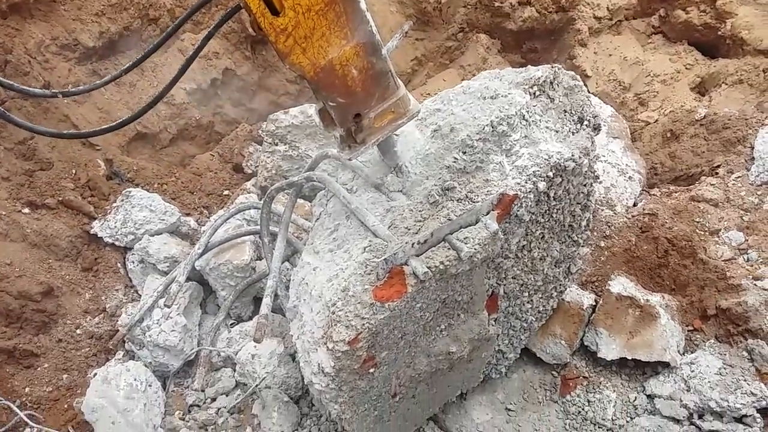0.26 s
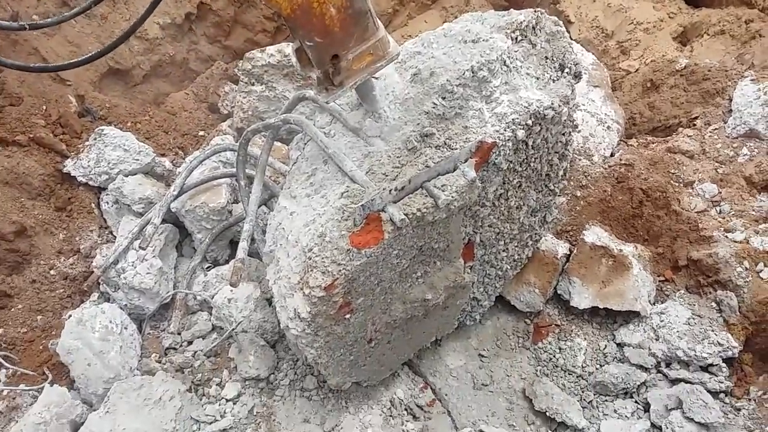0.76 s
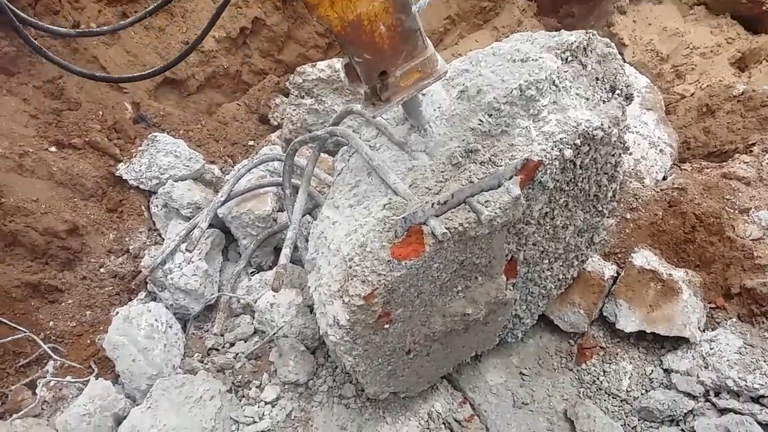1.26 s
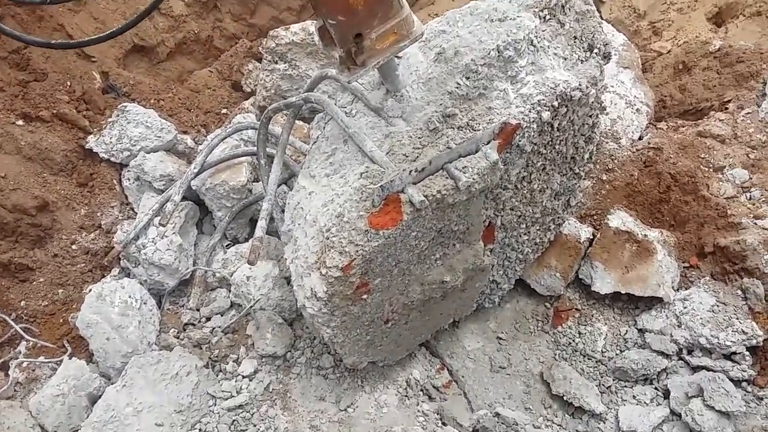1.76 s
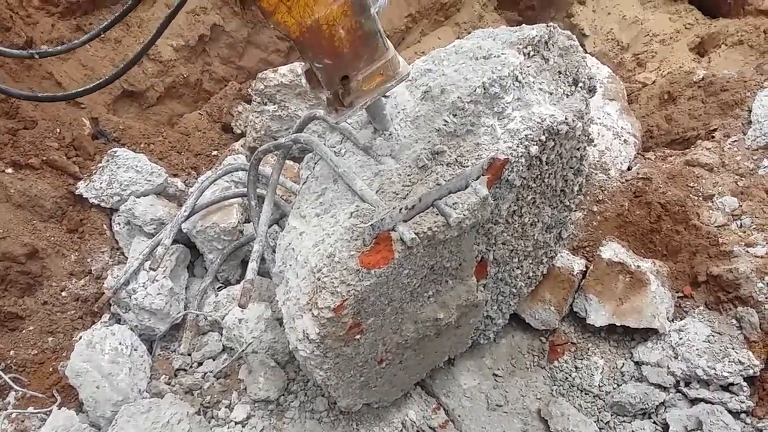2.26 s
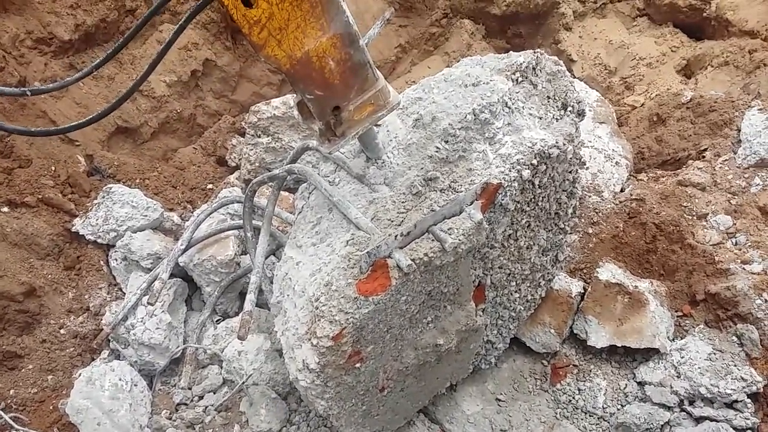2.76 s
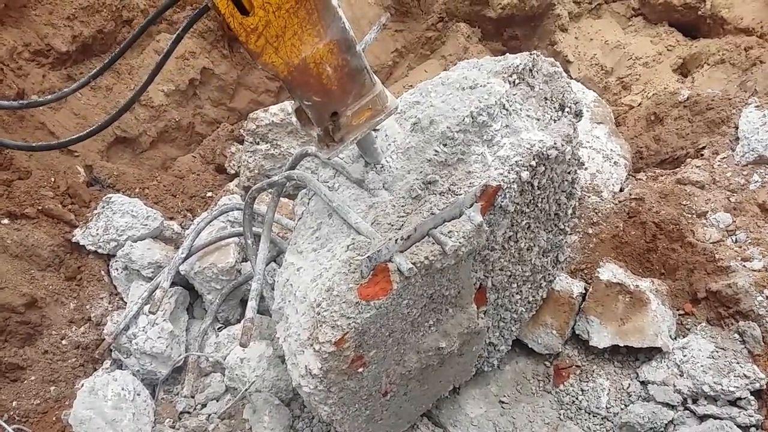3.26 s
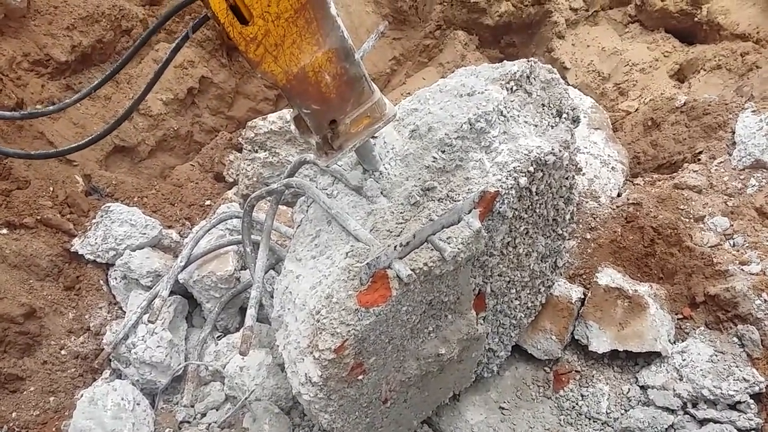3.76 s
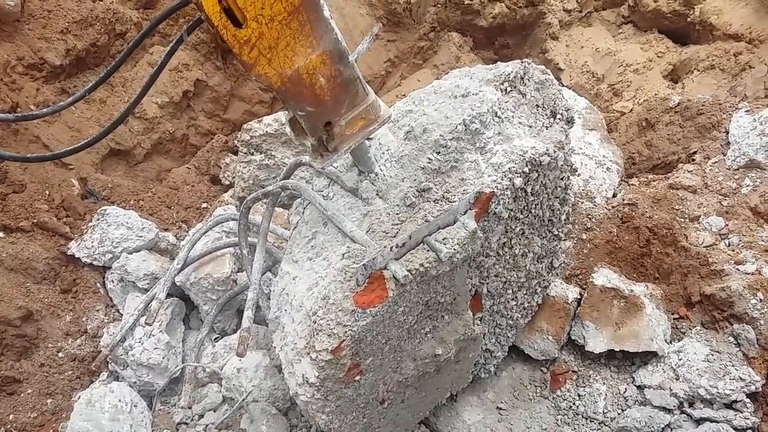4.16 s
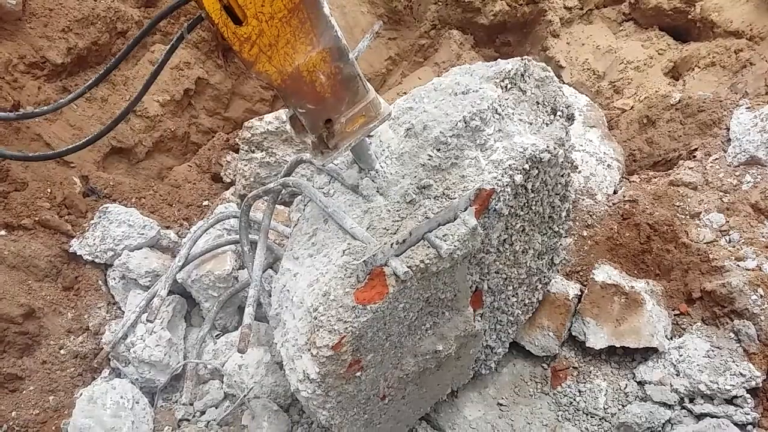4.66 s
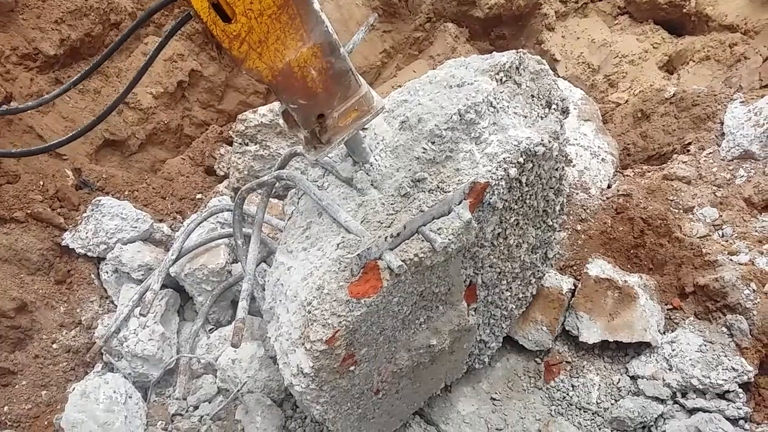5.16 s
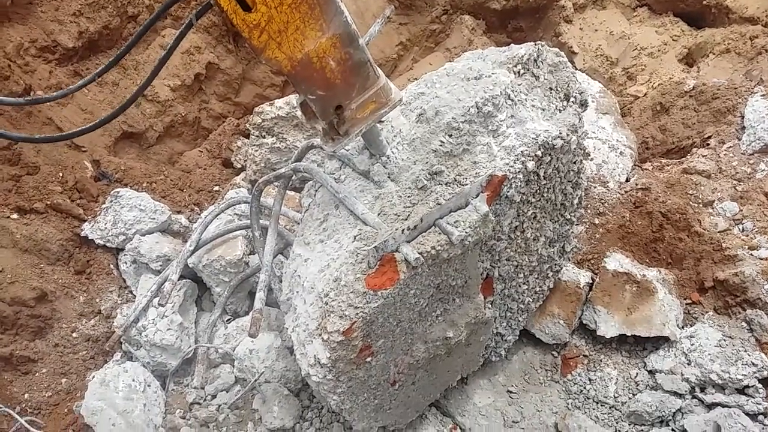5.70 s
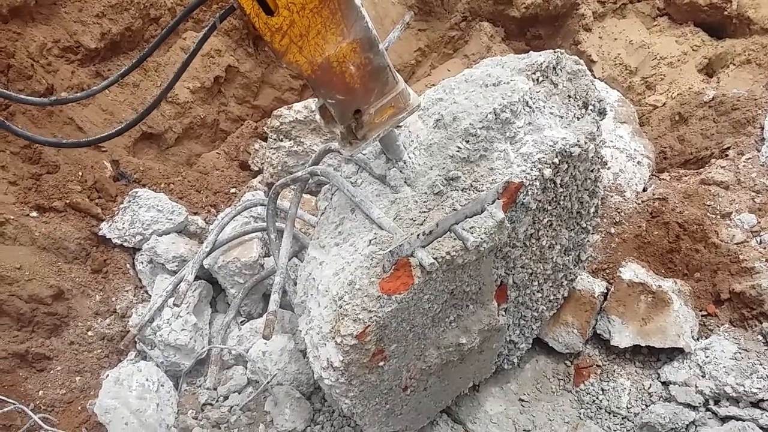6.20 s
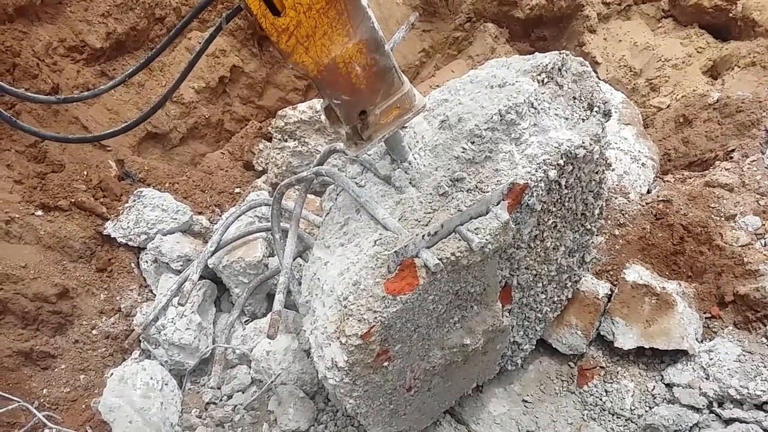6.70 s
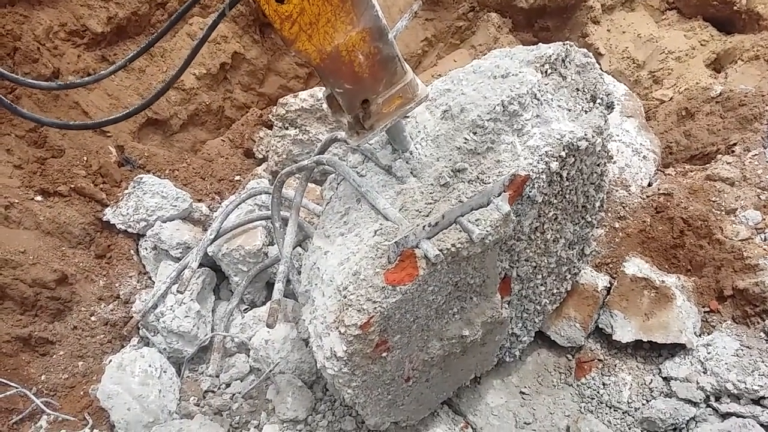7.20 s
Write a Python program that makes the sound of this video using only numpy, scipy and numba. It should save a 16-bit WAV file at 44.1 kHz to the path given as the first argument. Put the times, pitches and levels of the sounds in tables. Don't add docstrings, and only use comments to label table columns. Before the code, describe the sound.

Rapid, harsh steel-on-concrete hammering from an excavator's breaker, ringing and gritty, briefly resetting twice while a diesel engine hums underneath.

```python
import sys
import numpy as np
from scipy import signal
from scipy.fft import rfft, irfft
from scipy.io import wavfile
from scipy.ndimage import uniform_filter1d, minimum_filter1d
from numba import njit

SR = 44100
rng = np.random.default_rng(int(sys.argv[2]) if len(sys.argv) > 2 else 0)


def generate_wav(sig):
    pcm = np.round(np.clip(np.atleast_2d(sig).T, -1, 1) * 32767).astype(np.int16)
    wavfile.write(sys.argv[1], SR, pcm)


def natural_amplitude(level_db):
    exponent = np.asarray(level_db, float) / 20
    return 10 ** exponent


N = 328104

COLOUR_HZ = [250, 900, 2200, 3000, 4400, 8000]
RUN_START_S = [1.3, 5.2]
# hz, t60_s
CRACK_T60 = [(200, 0.088), (1000, 0.027), (3000, 0.045), (6000, 0.075), (9000, 0.051), (14000, 0.039)]


def on_log(table, hz):
    table_hz, *columns = np.transpose(table)
    return np.array([np.interp(np.log(hz), np.log(table_hz), column) for column in columns])


def blows():
    run_blows = [13, 40, 24]
    # first_blow_s, period_ms, change_per_blow_ms, slow_start_ms, late_last_blow_ms
    runs = [
        (-.0060, 94.67, 0, 0, 0),
        (1.3474, 94.07, -.025, 10.4, 16.2),
        (5.2297, 92.98, 0, 0, 0),
    ]
    # db_900_hz, db_2200_hz, db_3000_hz, db_4400_hz
    seat_db = [(-17.5, -9, -16, -15.5), (-17, -12, -18.5, -18.5), (-20.5, -14.5, -17, -16.5)]
    # db_900_hz, db_2200_hz, db_3000_hz, db_4400_hz
    sunk_db = [(-1.2, -2, 1.1, -2), (-3.5, -3.5, 2.3, 4), (-1, -1.5, .3, 0.5)]
    # time_s, depth_0_to_1
    depth_curve = [(0, 0), (.6, 0.7), (1.2, 0.6), (1.34, 0.13), (2.2, 0.14), (3.0, 0.5), (3.9, 0.85),
                   (5.1, 0.83), (5.22, 0), (7.4, 1)]
    # time_s, level_db, tilt_db_per_octave
    glancing = [
        (1.13, -0.5, -1.5),
        (1.347, 1.5, -1),
        (5.023, -0.2, 0.5),
        (5.23, -1.7, -1),
    ]
    start_keep, jitter_ms = 0.28, 0.35
    force_scatter_db, colour_scatter_db = 0.7, 0.9

    run = np.repeat(np.arange(len(runs)), run_blows)
    k = np.concatenate([np.arange(n) for n in run_blows])
    first_s, period, change, slow, late = np.array(runs)[run].T
    luck = rng.spawn(1)[0].standard_normal((len(k), 6))
    last = np.diff(run, append=-1) != 0
    ms = period * k + change * k ** 2 / 2
    ms = ms + slow * (1 - start_keep ** k) + late * last + jitter_ms * luck[:, 0]
    when = first_s + ms / 1000
    depth = np.interp(when, *np.transpose(depth_curve))[:, None]
    shares = np.array(seat_db)[run] + depth * np.array(sunk_db)[run]
    shares = shares + colour_scatter_db * luck[:, 2:]
    force = force_scatter_db * luck[:, 1]
    for s, db, tilt_db in glancing:
        b = np.abs(when - s).argmin()
        force[b] += db
        shares[b] += tilt_db * np.log2(np.array(COLOUR_HZ[1:-1]) / COLOUR_HZ[2])
    return np.column_stack([when, force, shares])


def impacts(rows):
    # time_s, level_db against a full blow
    rebounds = [
        (1.147, -10),
        (1.361, -10),
        (5.046, -11),
        (5.239, -10),
    ]
    mean_db = rows[:, 1].mean()
    extra = [(s, mean_db + db, *rows[rows[:, 0] < s][-1, 2:]) for s, db in rebounds]
    rows = np.array(sorted([*map(tuple, rows), *extra]))
    when, run = rows[:, 0] - .0029, np.searchsorted(RUN_START_S, rows[:, 0])
    force = rows[:, 1] - rows[:, 1].mean()
    shares = np.pad(rows[:, 2:], ((0, 0), (1, 1)))
    sparkle_db = np.outer(1.5 * rng.standard_normal(len(rows)), np.array(COLOUR_HZ) > 6000)
    return when, run, force, shares, sparkle_db


def colour(hits, hz, among, bar_share):
    _, _, force, shares, sparkle_db = hits
    change_db = (shares - shares[among].mean(0)) * [0, bar_share, 1, 1, 1, 0]
    off_db = force[:, None] + change_db + sparkle_db
    return natural_amplitude([np.interp(np.log(hz), np.log(COLOUR_HZ), row) for row in off_db])


def drifting(run, count, keep, reseat):
    w = np.exp(2j * np.pi * rng.random((len(run), count)))
    for b in range(1, len(run)):
        k = np.clip(keep if run[b] == run[b - 1] else reseat, 0, 1)
        w[b] = k * w[b - 1] + np.sqrt(1 - k * k) * w[b]
    return w


def dense(table, t60_table, count, scatter_db, age_s):
    edge = np.linspace(np.sqrt(135), np.sqrt(15800), count + 1) ** 2
    hz = edge[:-1] + np.diff(edge) * rng.random(count)
    t60 = on_log(t60_table, hz)[0] * np.exp(0.061 * rng.standard_normal(count))
    db = on_log(table, hz) + scatter_db * rng.standard_normal(count) + 60 * age_s / t60
    return hz, t60, natural_amplitude(db) * np.sqrt(4 * np.diff(edge) / SR)


def strike(when, gain, hz, t60, rise_s, span_s, spread, rough, choke_s=None):
    swell_s, swell_hz, port_lag_s, block = .017, 250, 0.00012, 64
    t = np.arange(int(span_s * SR) // block * block, dtype=np.float32) / SR
    delay_s = np.float32(0.00038 * (np.clip(6000 / hz, 1, 2.6) - 1))
    since = np.maximum(t - delay_s[:, None], 0)
    swing_s = swell_s * np.minimum(swell_hz / hz, 1) ** 1.45
    mode_rise_s = np.float32(rise_s * np.clip(3000 / hz, .5, 4) ** 0.26 + swing_s)
    rise = (1 - np.exp(-since / mode_rise_s[:, None])) ** 2
    decay = np.exp(np.float32(-np.log(1000) / t60)[:, None] * t)
    fade = decay * rise * np.cos(np.pi / 2 * (t / span_s) ** 4)
    steps = np.cumsum(rng.standard_normal((len(hz), len(t) // block)), axis=1)
    wander = rough * np.sqrt(block / SR * hz[:, None] / 3000) * steps
    wander = uniform_filter1d(np.repeat(np.float32(wander), block, axis=1), block)
    turn = np.float32(2 * np.pi * hz)[:, None] * t + wander
    waves = np.vstack([fade * np.cos(turn), fade * np.sin(turn)]).astype(np.float32)
    patch = rng.standard_normal(len(hz)) + 0.78 * rng.standard_normal(gain.shape[1:])
    apart = 2 * np.pi * hz * port_lag_s + spread * np.minimum(hz / 1500, 1.3) * patch
    gain = gain * np.exp(.5j * np.array([apart, -apart]))
    rings = np.concatenate([gain.real, -gain.imag], axis=2).astype(np.float32) @ waves
    if choke_s is not None:
        late_s = np.maximum(t - np.diff(when, append=SR)[:, None], 0)
        rings = rings * np.exp(-late_s / choke_s)
    out, pad = np.zeros((2, N + 2 * SR)), SR
    for b, s in enumerate(when):
        i = pad + int(s * SR)
        out[:, i:i + len(t)] += rings[:, b]
    return out[:, pad:pad + N]


def mode_crowd(hits, crowd, rise_s, span_s, keep, rough, level_db):
    when, run = hits[:2]
    hz, t60, size = crowd
    weight = drifting(run, len(hz), keep, reseat=0.43) * colour(hits, hz, run >= 0, bar_share=1.0)
    gain = natural_amplitude(level_db) * size[:, None] * weight
    return strike(when, gain, hz, t60, rise_s, span_s, spread=1.0, rough=rough)


def crack(hits):
    # hz, left_db, right_db
    crack_db = [(149, 11, -7), (327, 0.5, 4), (523, -3.5, -32), (1015, 6.5, 0), (1590, -1, -10),
                (2350, -1.5, 5), (2340, -15.5, -3.5), (2910, 1.5, 4.5), (3430, -6.5, -7), (4200, 1.5, -2),
                (4600, -6, -11), (6230, -8, -13.5), (6600, -19, -18.5), (11770, -32.5, -33.5)]
    crowd = dense(crack_db, CRACK_T60, count=450, scatter_db=2.0, age_s=.006)
    return mode_crowd(hits, crowd, rise_s=.0008, span_s=.09, keep=.93, rough=8, level_db=0)


def ring(hits):
    # hz, left_db, right_db
    ring_db = [(150, -8, -15), (347, -18.5, -14.5), (630, -8.5, -13), (1020, -9, -6.5), (1460, -15, -14.5),
               (2220, -20, -6.5), (2240, -29.5, -12), (3130, -14, -5.5), (3260, -13, -21),
               (3930, -20.5, -10.5), (4900, -10, -30), (5850, -26, -29), (6900, -34, -44),
               (11200, -52, -78)]
    # hz, t60_s
    ring_t60 = [(200, 0.23), (1000, 0.33), (3000, 0.17), (6000, 0.32), (12000, 0.38)]
    crowd = dense(ring_db, ring_t60, count=450, scatter_db=2.0, age_s=.044)
    return mode_crowd(hits, crowd, rise_s=.004, span_s=.27, keep=.8, rough=16, level_db=-4)


def steel_tool(hits):
    steel_hz = [160, 234, 250, 452, 606, 706, 801, 850, 968, 1045, 1142, 1236, 1375]
    # t60_s, left_minus_right_db, seat_1_db, seat_2_db,
    # seat_3_db
    steel = [(0.31, -1, -31, -28.5, -28), (0.43, 0.5, -21.5, -31.5, -34), (0.3, -0.5, -58, -28, -27),
             (0.23, -18.5, -35, -38.5, -42), (0.17, 18, -29.5, -31.5, -37.5),
             (0.15, -3, -18.5, -21.5, -31.5), (0.45, 0, -29.5, -24.5, -29.5), (0.09, 2, -42, -26.5, -36),
             (0.22, -1, -15, -13.5, -40), (0.071, -18, -33, -55, -21), (0.13, -18, -24.5, -24, -27),
             (0.14, -23, -25, -27, -32.5), (0.17, 11, -50, -26.5, -53),
             (0.37, 28, -44, -45, -81), (0.59, 6, -44, -38, -39.5), (0.13, -16.5, -16, -25, -31),
              (0.14, 13.5, -16, -22, -23.5), (0.1, -34, -41, -29, -26), (0.033, -25, -16, -18.5, -10.5),
              (0.085, -16, -11.5, -32, -24), (0.19, -9, -22, -29, -27), (0.037, -37, -49, -24, -22),
              (0.11, 27.5, -28.5, -30, -33), (0.068, 17, -29, -15, -18.5), (0.065, 15.5, -32, -16, -17.5),
              (0.055, 15.5, -32, -18, -22.5)]
    steel_high_hz = [1500, 1860, 2127, 2190, 2810, 3050, 3157, 3690, 3878, 4306, 4748, 4915, 5040]
    # time_s, mode_801_hz_db, mode_968_hz_db
    grip = [(0, 2, 0), (1.2, 7.5, 2), (1.4, -3, -4.5), (2.2, 3, -1.5), (3.2, 4.5, -2.5), (4.0, 2, -4),
            (5.1, 0.5, -19), (5.5, 1, -30), (6.0, -5, -21)]
    when, run = hits[:2]
    hz, (t60, pan_db, *seat_db) = np.array(steel_hz + steel_high_hz), np.transpose(steel)
    grip_s, *grip_db = np.transpose(grip)
    out = np.zeros((2, N))
    for k, db in enumerate(seat_db):
        seated = run == k
        weight = drifting(run, len(hz), keep=0.95, reseat=0)
        weight = weight / abs(weight) * colour(hits, hz, seated, bar_share=1.5)
        weight = weight[seated]
        for mode_hz, curve_db in zip([801, 968], grip_db):
            weight[:, hz == mode_hz] *= natural_amplitude(np.interp(when[seated], grip_s, curve_db))[:, None]
        gain = natural_amplitude(db + 2 + np.array([pan_db, -pan_db]) / 2)[:, None] * weight
        out += strike(when[seated], gain, hz, np.clip(t60, .03, .6), rise_s=0.00075, span_s=.3,
                      spread=.45, rough=4.4, choke_s=.02)
    return out


def grit(when):
    # hz, density_db_per_hz
    grit_db = [(2500, -30), (4000, -17), (6000, 6), (9000, -5.5), (15000, -20)]
    fall_s, clicks_per_s = .06, 2200
    kicks = np.zeros(N)
    kicks[np.clip(when * SR, 0, N - 1).astype(int)] = natural_amplitude(1.1 * rng.standard_normal(len(when)))
    fall = signal.lfilter([1], [1, -np.exp(-1 / (fall_s * SR))], kicks)
    clicks = (rng.random((2, N)) < clicks_per_s / SR) * rng.standard_normal((2, N))
    clicks = clicks * natural_amplitude(2.5 * np.minimum(rng.exponential(size=(2, N)), 3))
    hz = np.fft.rfftfreq(N, 1 / SR) + 1
    patter = irfft(rfft(clicks * fall) * natural_amplitude(on_log(grit_db, hz)), N)
    return natural_amplitude(-49.5) * patter / patter.std()


def valve(when):
    # hz, left_db, right_db
    tick_db = [(800, -49, -56), (2190, -59, -11), (3900, -16, -22.5), (5800, -24.5, -31), (6740, -37, -45),
               (8600, -43.5, -41.5), (14300, -51, -54)]
    # lead_on_blow_s, run_1_db, run_2_db, run_3_db
    ticks = [
        (.0235, 1.5, 4, 4),
        (.034, 3, -9, -6.5),
    ]
    run = np.searchsorted(RUN_START_S, when)
    resumed = np.diff(run, prepend=0) > 0
    out = np.zeros((2, N))
    for k, (lead_s, *run_db) in enumerate(ticks):
        hz, t60, size = dense(tick_db, CRACK_T60, count=200, scatter_db=3.5, age_s=0.0014)
        uneven = rng.standard_normal((len(when), 2))
        loud = natural_amplitude(np.array(run_db)[run] + 1.0 * uneven[:, 0])[:, None]
        loud[resumed] *= 1 - k
        weight = loud * drifting(run, len(hz), keep=0.97, reseat=0.62)
        tick_s = when - lead_s + 0.0011 * uneven[:, 1]
        out += strike(tick_s, size[:, None] * weight, hz, t60, rise_s=0.00064, span_s=0.064,
                      spread=1.0, rough=28)
    return out


def breaker():
    rows = blows()
    when, hits = rows[:, 0], impacts(rows)
    return crack(hits) + ring(hits) + steel_tool(hits) + grit(when) + valve(when)


def walk(rate_hz):
    k = int(SR / rate_hz)
    held = np.repeat(rng.standard_normal(N // k + 1), k)
    w = uniform_filter1d(uniform_filter1d(held, k), k)[:N]
    return w / w.std()


def excavator():
    # hz, level_db
    diesel = [(53.8, -51), (80, -59.5), (108, -58), (161.5, -66)]
    # hz, density_db_per_hz
    site_db = [(35, -59), (60, -8.5), (118, -2), (184, 2), (492, -2.5), (579, -3.5), (968, -5.5),
               (1440, -10), (2650, -2.5), (3420, -13.5), (4860, -14), (16000, -81)]
    noise_db, waver_db = -33.5, 1.5
    turn = 2 * np.pi * np.cumsum(1 + 0.00502 * walk(7.3)) / SR
    lines = sum(np.sqrt(2) * natural_amplitude(db + 1.3 * walk(22)) * np.sin(hz * turn) for hz, db in diesel)
    hz = np.fft.rfftfreq(N, 1 / SR) + 1
    mid, side = rfft(rng.standard_normal((2, N))) * natural_amplitude(on_log(site_db, hz))
    noise = irfft(mid + np.clip(hz / 1500, .22, 1) * side * np.array([[1], [-1]]), N)
    return lines + noise * natural_amplitude(noise_db + waver_db * walk(6.0)) / noise.std()


def scene():
    return breaker() + excavator()


@njit
def follow(x, release):
    e, y = 0., np.empty(len(x))
    for i in range(len(x)):
        e = max(x[i], e * release)
        y[i] = e
    return y


def band_limit(x):
    return signal.sosfilt(signal.butter(12, 16510, fs=SR, output="sos"), x)


def record(dry):
    release_s, threshold, ceiling = 0.0009, .75, .98
    peak = follow(np.abs(dry).max(0), np.exp(-1 / (release_s * SR))) + 1e-9
    gain = np.minimum(np.minimum(1, (threshold / peak) ** .5), ceiling / peak)
    gain = uniform_filter1d(minimum_filter1d(gain, size=48), size=48)
    bass_cut = signal.butter(3, 44, "high", fs=SR, output="sos")
    top_cut = signal.butter(12, 15300, fs=SR, output="sos")
    mix = signal.sosfilt(top_cut, signal.sosfilt(bass_cut, dry * gain))
    return band_limit(mix)


dry = scene()
out = record(dry)
generate_wav(out)
```